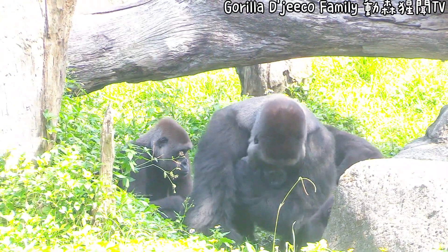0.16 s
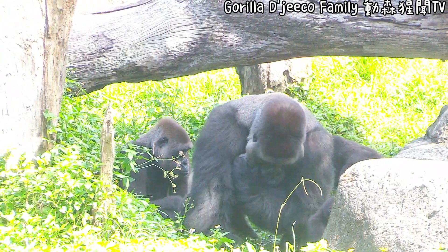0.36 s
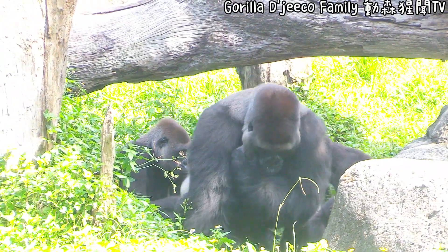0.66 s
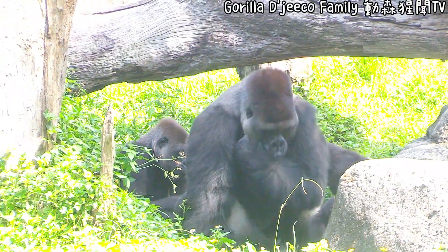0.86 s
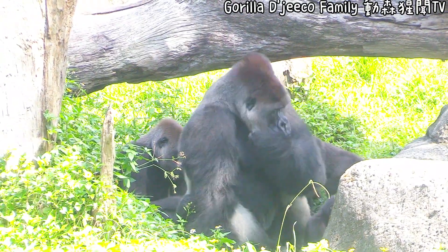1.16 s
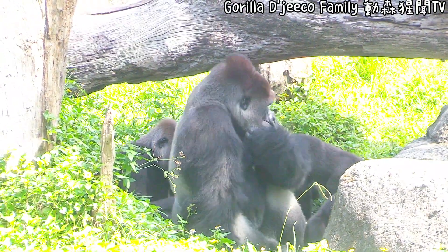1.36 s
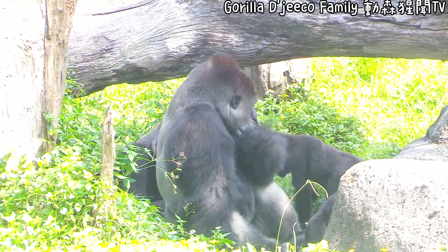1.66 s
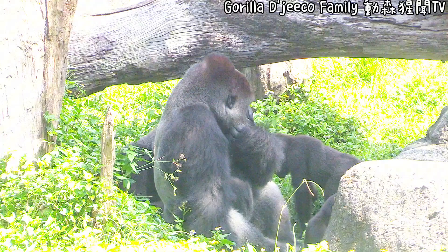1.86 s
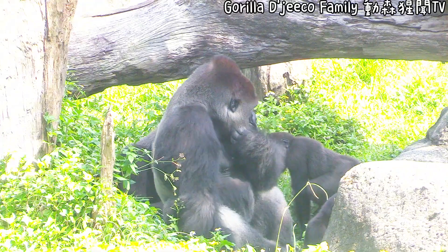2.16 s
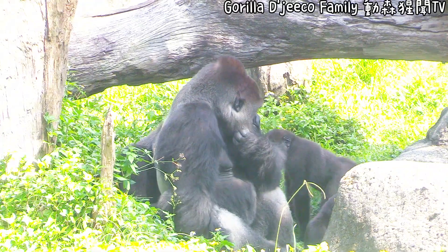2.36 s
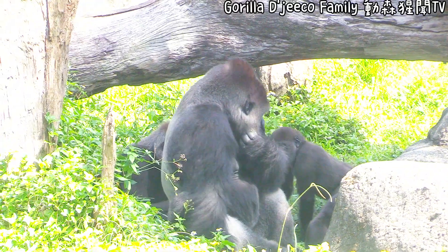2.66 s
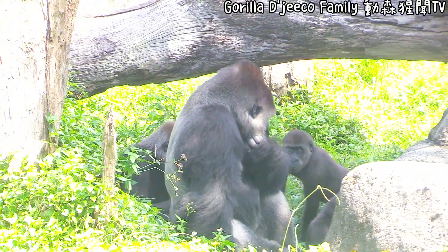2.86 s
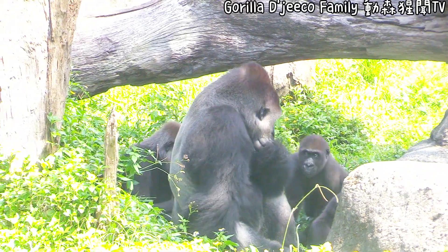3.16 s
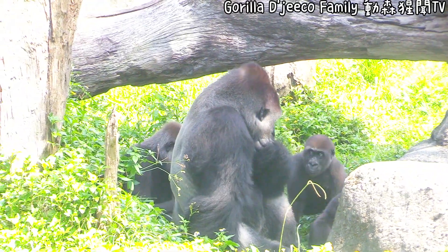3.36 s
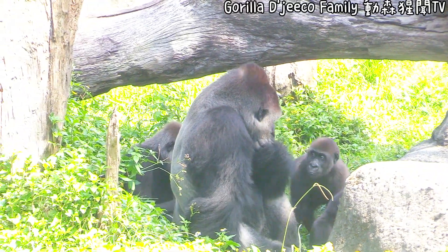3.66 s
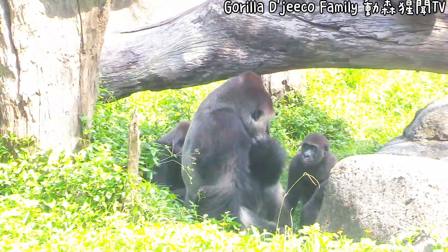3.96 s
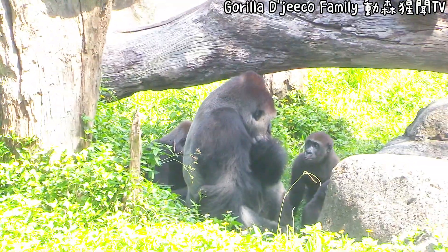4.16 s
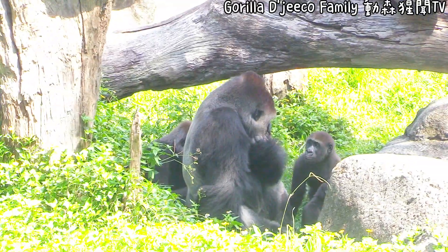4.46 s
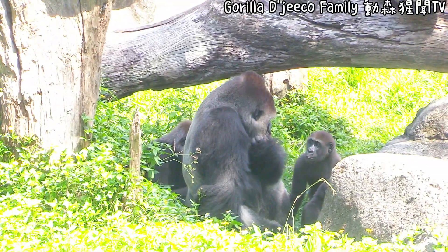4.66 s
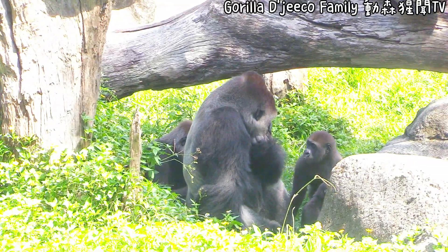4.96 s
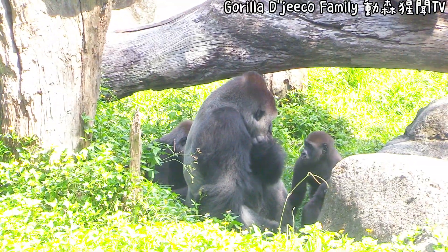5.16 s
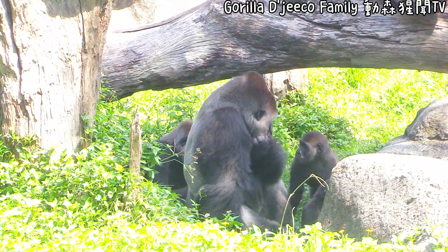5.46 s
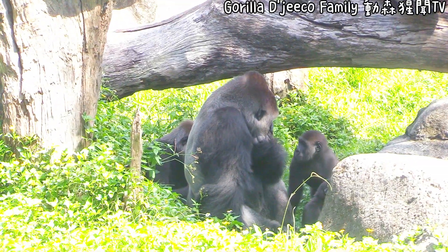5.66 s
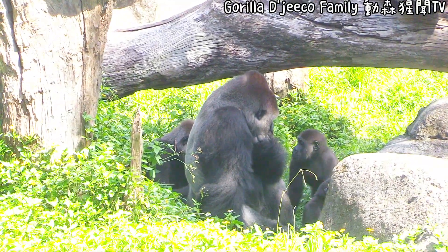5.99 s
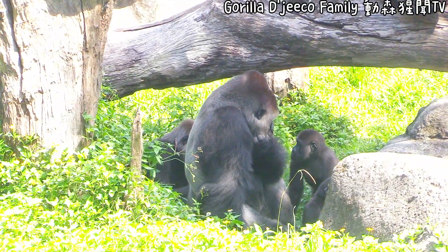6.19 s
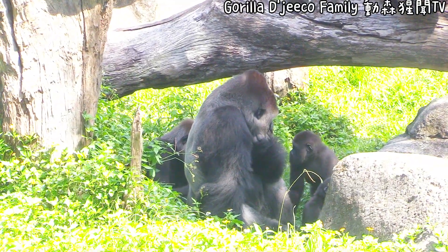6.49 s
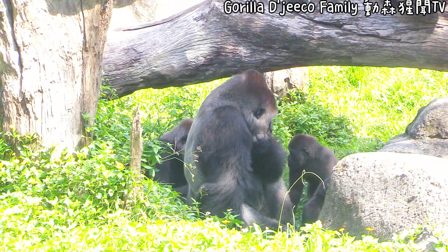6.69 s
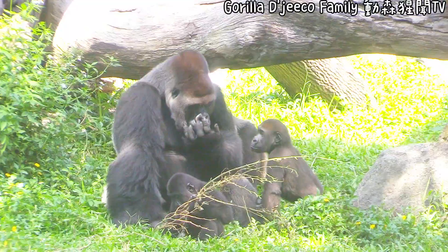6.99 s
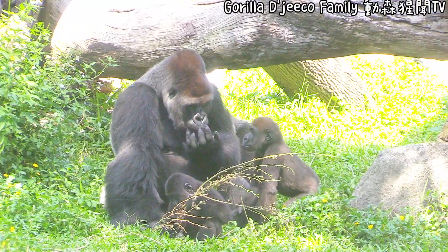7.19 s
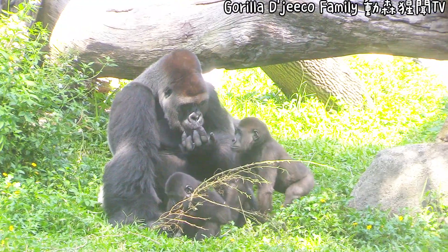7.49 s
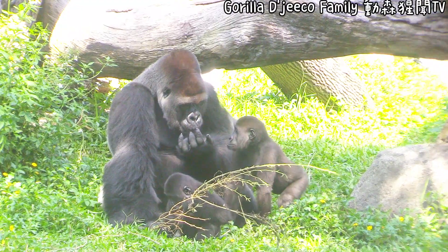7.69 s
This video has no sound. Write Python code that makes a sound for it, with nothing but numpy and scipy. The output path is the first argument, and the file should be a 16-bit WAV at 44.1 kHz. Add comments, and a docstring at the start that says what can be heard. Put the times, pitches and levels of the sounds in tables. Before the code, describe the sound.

A steady engine drone with twigs snapping now and then, cutting to a fainter hum with a rasping insect and one bird chirp.

```python
"""A steady engine drone comes first, from behind a leafy gorilla enclosure: six cylinders fire in turn,
valves rattle and cooling air rushes, over a thin hiss. Now and then a twig snaps and its wood rings.
Near the end the scene cuts to another spot, where the drone is faint. There an insect rasps in quick
strokes and a bird whistles one rising call, smeared by echoes from the leaves."""
import sys
import numpy as np
from scipy import signal
from scipy.fft import rfft, irfft, next_fast_len
from scipy.io import wavfile
from scipy.ndimage import map_coordinates

SR = 44100
rng = np.random.default_rng(int(sys.argv[2]) if len(sys.argv) > 2 else 0)


def transcribe(u):
    """Save the signal u as a 16-bit wav file named by the first command-line argument.

    u: samples, shape (n,) or (channels, n), limited to [-1, 1]; the rate is SR.
    q: integer samples, one column per channel.
    """
    v = np.clip(np.atleast_2d(u).T, -1, 1)
    q = np.round(v * 32767).astype(np.int16)
    wavfile.write(sys.argv[1], SR, q)


N = 345289
TIME_S = np.arange(N) / SR
CYLINDERS, CYCLE_HZ = 6, 14.369  # every cylinder fires once in each four-stroke cycle
SWELL_DB = 0.66  # how far the drone gently rises and falls


def amp(db):
    """Turn decibels into a number to multiply a sound by."""
    return 10 ** (np.asarray(db) / 20)


def unit(x):
    """Scale a sound to an average (rms) level of 1."""
    return x / np.sqrt(np.mean(x ** 2) + 1e-20)


def along(points, hz):
    """Read between the rows of a (pitch_hz, value) table, on a musical (log) scale."""
    pitches, values = np.transpose(points)
    return np.interp(np.log(hz + 1), np.log(pitches + 1), values)


def wobble(rate_hz):
    """A smooth curve through rate_hz random values a second."""
    return map_coordinates(rng.standard_normal(1024), [TIME_S * rate_hz], mode="mirror")


def swell(peak_s=3.75, period_s=10):
    """A slow wave between -1 and 1, highest at peak_s."""
    return np.cos(2 * np.pi * (TIME_S - peak_s) / period_s)


def filtered(x, gain_at):
    """Turn each pitch in a sound up or down by gain_at(hz)."""
    size = x.shape[-1]
    padded = next_fast_len(size + 8192)
    return irfft(rfft(x, padded) * gain_at(np.fft.rfftfreq(padded, 1 / SR)), padded)[..., :size]


def noise(colour, likeness, size=N):
    """Stereo noise: colour sets its lows and highs; likeness 1 is the same in both ears, 0 unrelated."""
    width = lambda hz: np.arccos(np.clip(along(likeness, hz), -1, 1)) / 2
    shape = lambda hz: amp(along(colour, hz)) * [np.cos(width(hz)), np.sin(width(hz))]
    mid, side = filtered(rng.standard_normal((2, size)), shape)
    return unit(np.array([mid + side, mid - side]))


def tone(multiple, waver_db, spread, scramble_hz=870):
    """One engine tone: low ones keep step with the firings, echoes knock high ones out of step."""
    hz = multiple * CYCLE_HZ
    shift_cycles = min((hz / scramble_hz) ** 2, 1) * rng.random()
    phase = 2 * np.pi * (hz * TIME_S + shift_cycles) + waver_db / 9 * wobble(4.6)
    ear_shift = min(spread * hz / 400, 1)
    return np.sqrt(2) * amp(waver_db * wobble(3.67)) * np.sin([phase + ear_shift, phase - ear_shift])


def near_tone(multiple):
    """A tone of the engine close by; high ones follow the swell and waver more in the air."""
    swell_db = 0.54 * swell() if multiple > 3 * CYLINDERS else 0
    return amp(swell_db) * tone(multiple, waver_db=min(0.0025 * multiple, 1.5), spread=0.15)


# The main tones of the drone. Columns: multiple_of_cycle_rate, level_db
ENGINE_TONES = [(6, -47), (10, -50), (12, -41), (14, -61.5), (18, -45), (21, -62), (22, -60.5), (24, -59.5),
                (30, -57), (32, -63.5), (39, -64), (51, -66.5), (60, -65), (96, -67), (138, -66)]
def engine():
    """Firings hum at multiples of their rate (harmonics); unequal cylinders add tones in between."""
    second_db = SWELL_DB * swell() + np.array([[-.7], [.7]])  # a little louder on the right
    third_db = 1.36 * swell(peak_s=0.45, period_s=4.16)
    drift_db = {2 * CYLINDERS: second_db, 3 * CYLINDERS: third_db}
    drone = sum(amp(db + drift_db.get(k, 0)) * near_tone(k) for k, db in ENGINE_TONES)
    harmonics = np.arange(6, 10)
    levels_db = -65 - 15.5 * np.log2(harmonics / 6)  # 15.5 dB quieter per octave
    return drone + sum(amp(db) * near_tone(k * CYLINDERS) for k, db in zip(harmonics, levels_db))


# The lows and highs of the rattle. Columns: pitch_hz, relative_db
CLATTER_COLOUR = [(90, -40), (300, 17), (500, 0.5), (900, 3), (1250, -6), (1900, -11), (2800, -3.5),
                  (4000, -27), (8000, -66)]
def clatter(level_db=-56):
    """Valves and injectors rattle through the same pattern every cycle, making many weak tones."""
    cycle = rng.standard_normal((2, round(SR / CYCLE_HZ)))
    repeated = np.take(cycle, np.arange(N), axis=1, mode="wrap")
    return amp(level_db) * unit(filtered(repeated, lambda hz: amp(along(CLATTER_COLOUR, hz))))


# The deep rush of air. Columns: pitch_hz, relative_db
AIR_COLOUR = [(25, -25), (43, -22), (60, -6), (75, -5), (125, 1.5), (200, -3), (300, -3), (470, 0.5),
              (660, -5), (1100, -7), (1500, -7.5), (2850, -11), (3400, -19), (4400, -42), (8000, -37)]
# How alike the engine's noise is in both ears, near or far. Columns: pitch_hz, likeness
ENGINE_LIKENESS = [(60, 0.43), (200, 1), (330, 0.72), (470, 0.35), (750, 0.073), (1300, .05), (2100, 0.81),
                   (3300, 0.39)]
def cooling_air(level_db=-48.5, throb_depth=0.1):
    """The rush of cooling air follows the swell and throbs a little at every firing."""
    drift_db = SWELL_DB * swell() + 0.28 * wobble(5.4)
    throb = 1 + throb_depth * np.sin(2 * np.pi * CYLINDERS * CYCLE_HZ * TIME_S)
    return amp(level_db + drift_db) * throb * noise(AIR_COLOUR, ENGINE_LIKENESS)


# The bright background hiss. Columns: pitch_hz, relative_db
HISS_COLOUR = [(1000, -20), (4000, 3), (4600, -1), (6400, 1), (8000, -1.5), (11000, -3.5), (13200, -2.5),
               (15700, -12)]
# How alike the hiss is in both ears. Columns: pitch_hz, likeness
HISS_LIKENESS = [(4000, 0), (5500, 0.077), (9000, 0.65), (15000, 0.63)]
def hiss():
    """A thin, steady hiss, a little louder on the left."""
    return noise(HISS_COLOUR, HISS_LIKENESS) * amp([[.6], [-.6]])


# The tones that wood rings with. Columns: pitch_hz, relative_db, fade_s (time to drop 60 dB)
WOOD_TONES = [(740, -14, 0.026), (939, 2.5, 0.13), (1236, -3, 0.075), (1960, -1, 0.046), (2470, 2.5, 0.039),
              (3650, -16, 0.06)]
# The noise of tearing fibres. Columns: pitch_hz, relative_db
SPLINTER_COLOUR = [(100, -45), (450, -14), (1200, -5.5), (2200, -1.5), (3700, -5), (4600, -18),
                   (7000, -18.5), (15000, -46)]
# The sharp noise of the break. Columns: pitch_hz, relative_db
CRACK_COLOUR = [(100, -40), (500, 1), (2000, 12), (4800, -12), (7500, 1), (10000, 2), (12500, 7),
                (15500, -9)]
def snap(ping_hz, ping_fade_s, ping_db, splinter_db, crack_db, knock_db):
    """A twig breaks: a short ping, splintering fibres, a bright crack and the hollow ring of the wood."""
    t = np.arange(SR // 5) / SR
    fade = lambda fade_s: amp(-60 * t / fade_s)
    ring = lambda hz, fade_s: np.sin(2 * np.pi * hz * t) * fade(fade_s)
    burst = lambda colour: noise(colour, likeness=[(1000, 0.26)], size=len(t))
    ping = amp(ping_db) * ring(ping_hz, ping_fade_s)
    fibres = amp(splinter_db) * (fade(0.016) + amp(-28) * fade(0.22)) * burst(SPLINTER_COLOUR)
    crack = amp(crack_db) * fade(0.0024) * burst(CRACK_COLOUR)
    wood = sum(amp(db + rng.normal(0, 1)) * ring(hz, fade_s) for hz, db, fade_s in WOOD_TONES)
    fade_in = 1 - np.exp(-t / .00015)
    return crack + fade_in * (ping + fibres + amp(knock_db) * wood)


# One row for each breaking twig.
# Columns: start_s, ping_hz, ping_fade_s, ping_db, splinter_db, crack_db, knock_db, left_over_right_db
TWIG_SNAPS = [(1.0514, 3450, .012, -30, -29, -37, -60, 1), (1.116, 2400, .025, -33, -25, -30, -60, -4),
              (1.1434, 3420, .011, -15, -21, -39, -33.5, -2), (1.859, 6840, .012, -42.5, -60, -40, -66, 2),
              (2.789, 3000, .012, -41, -50, -35, -68, 3), (4.034, 1270, .02, -36, -51, -58, -56, -6),
              (4.053, 3470, .03, -49, -40, -58, -52.5, -1), (4.368, 2820, 0.0099, -39, -43, -39, -65, 6),
              (5.149, 1500, .006, -23, -22.5, -24.5, -50, 2),
              (5.8904, 3530, 0.023, -31.5, -32, -47, -40.5, -1),
              (5.9814, 2130, 0.021, -29, -39, -38, -65, -6)]
def twigs():
    """Twigs snap one by one, each at its own place between left and right."""
    out = np.zeros((2, N + SR))
    for start_s, *settings, left_over_right_db in TWIG_SNAPS:
        hit = snap(*settings) * amp([[left_over_right_db / 2], [-left_over_right_db / 2]])
        start = round(start_s * SR)
        out[:, start:start + hit.shape[1]] += hit
    return out[:, :N]


# The engine tones that reach the second spot. Columns: multiple_of_cycle_rate, level_db
FAR_TONES = [(6, -66.5), (12, -55), (18, -62.5), (30, -66)]
# The rumble around them. Columns: pitch_hz, relative_db
RUMBLE_COLOUR = [(25, -27), (45, -14), (90, -6), (140, 0), (250, 1), (420, 0.5), (650, -5), (1150, -5),
                 (1450, -8), (2200, -9), (2850, -9.5), (3600, -24), (6000, -50)]
def far_engine():
    """From the second spot only a few wavering tones stand out of the rumble."""
    tones = sum(amp(db) * tone(k, waver_db=2.5, spread=0.14) for k, db in FAR_TONES)
    rumble = amp(-49.5 + 0.21 * wobble(8)) * noise(RUMBLE_COLOUR, ENGINE_LIKENESS)
    return tones + rumble


# The insect's rasp, with peaks where it rings. Columns: pitch_hz, relative_db
INSECT_COLOUR = [(3000, -33), (4000, -12), (4600, -10), (5250, 2), (5700, -8), (6400, 1), (7000, 3.5),
                 (7600, -17), (8600, -8), (9500, -2), (10300, -31), (14000, -38)]
# How much of the rasp pulses. Columns: pitch_hz, pulsing_share (0 to 1)
INSECT_PULSING = [(5500, .15), (6400, 0.59), (7400, .95), (8600, .3)]
def insect(level_db=-60, stroke_depth_db=4.0, stroke_hz=16.5, stroke_peak_s=7.302):
    """An insect rasps at a few high pitches: the main one pulses with each stroke, the others sing on."""
    stroke = np.cos(2 * np.pi * stroke_hz * (TIME_S - stroke_peak_s) + .2 * wobble(4))
    share = lambda hz: along(INSECT_PULSING, hz)
    rasp = lambda: noise(INSECT_COLOUR, likeness=[(6000, .25)])
    pulsing = filtered(rasp(), lambda hz: np.sqrt(share(hz)))
    steady = filtered(rasp(), lambda hz: np.sqrt(1 - share(hz)))
    return amp(level_db) * (amp(stroke_depth_db * stroke) * pulsing + steady)


def whistle(peak_s, pitch_hz, level_db, rise_hz_per_s=8800, fade_in_s=0.011, fade_out_s=0.022):
    """One whistled note slides up while it swells and fades."""
    t = TIME_S - peak_s
    loudness = np.exp(-(t / np.where(t < 0, fade_in_s, fade_out_s)) ** 2)
    phase = 2 * np.pi * (pitch_hz * t + rise_hz_per_s * t * t / 2)
    return amp(level_db) * loudness * np.sqrt(2) * np.sin(phase)


# The notes of the bird's call. Columns: peak_s, pitch_hz, level_db (before direct_db and echo_db)
BIRD_NOTES = [(7.409, 2180, -55), (7.443, 2440, -58), (7.477, 2840, -47.5)]
def bird(direct_db=-1, echo_db=-3, echo_fade_s=0.23):
    """Three notes run together into one rising call, smeared by echoes from the leaves."""
    call = sum(whistle(*row) for row in BIRD_NOTES)
    t = np.arange(SR // 2) / SR
    tail = rng.standard_normal((2, len(t))) * amp(-60 * t / echo_fade_s)
    echo = signal.fftconvolve(call[None], tail / np.linalg.norm(tail[0]), axes=1)[:, :N]
    return amp(direct_db) * call + amp(echo_db) * echo


def scene(cut_s=6.7625, fade_in_s=0.01):
    """The first spot stops suddenly at cut_s, and the second fades in right away."""
    background = hiss()
    first_spot = engine() + clatter() + cooling_air() + twigs() + amp(-56.5) * background
    duller_hiss = filtered(background, lambda hz: amp(along([(8000, -56.5), (13000, -59)], hz)))
    second_spot = far_engine() + insect() + bird() + duller_hiss
    return first_spot * (TIME_S < cut_s) + second_spot * np.clip((TIME_S - cut_s) / fade_in_s, 0, 1)


def record(dry, top_hz=15780):
    """Take away the very highest treble, above top_hz."""
    return filtered(dry, lambda hz: hz < top_hz)


dry = scene()
out = record(dry)
transcribe(out)
```